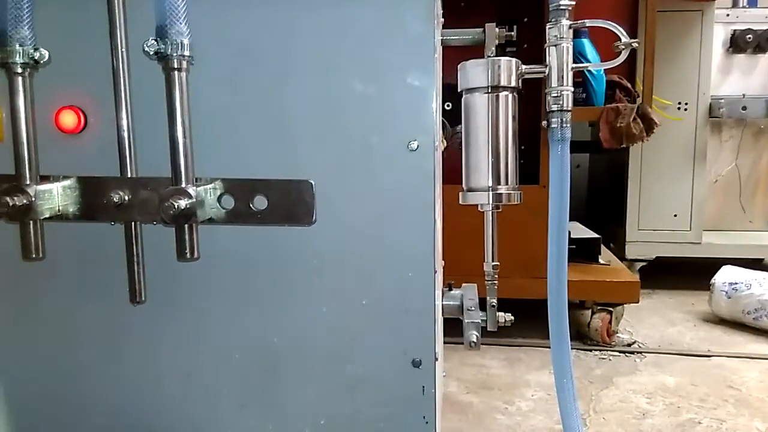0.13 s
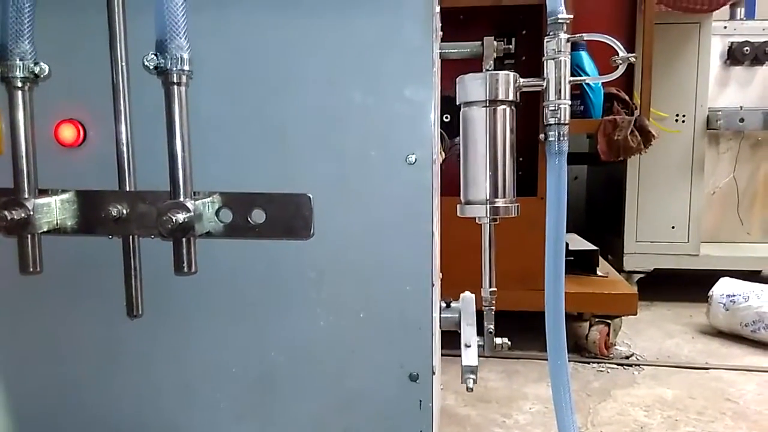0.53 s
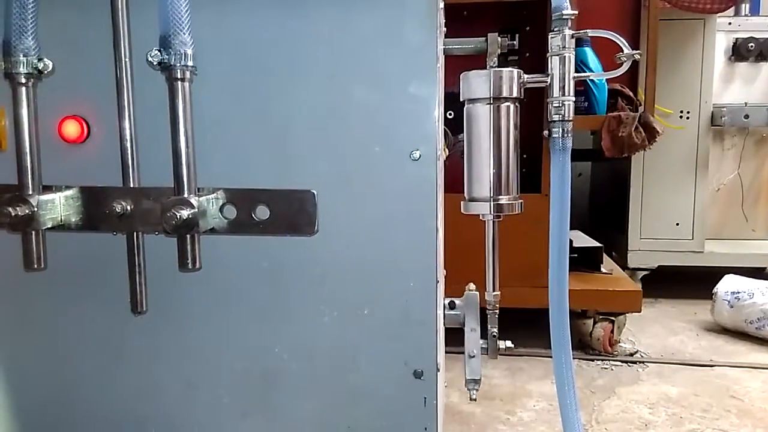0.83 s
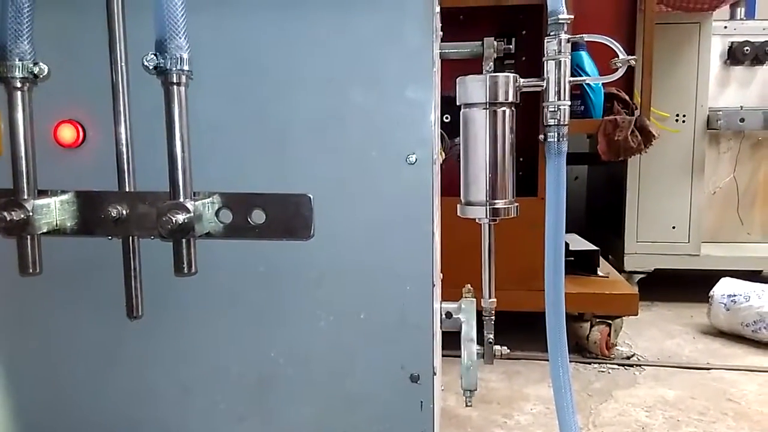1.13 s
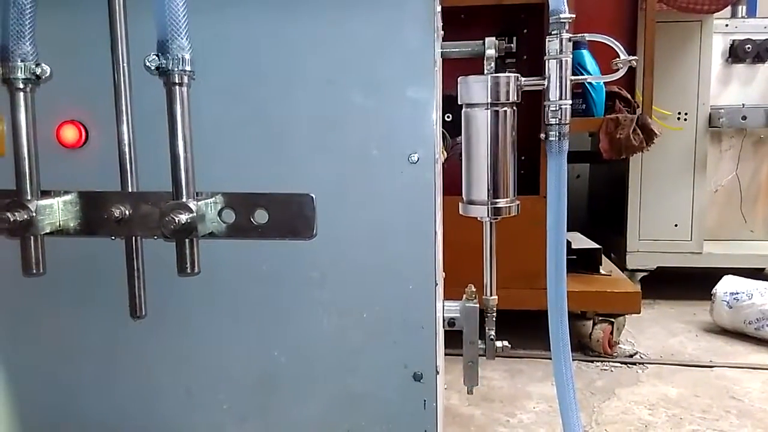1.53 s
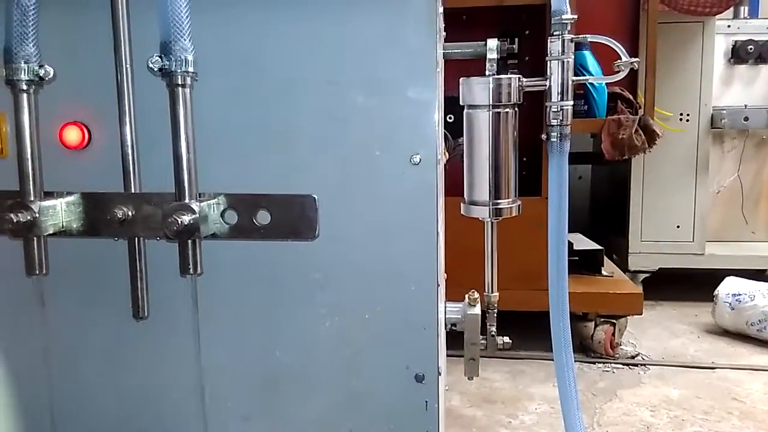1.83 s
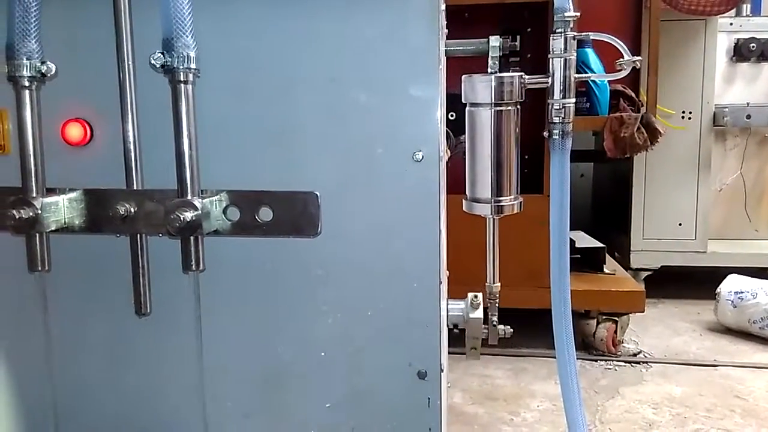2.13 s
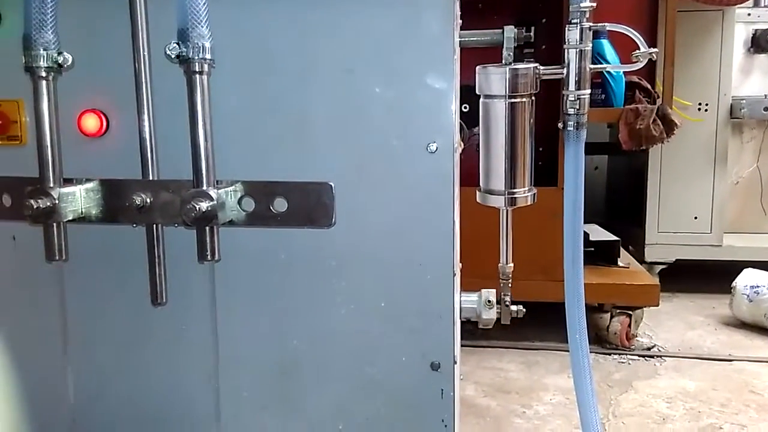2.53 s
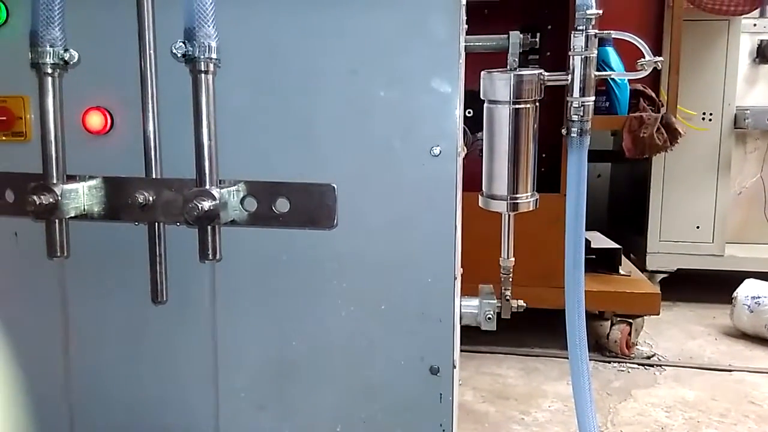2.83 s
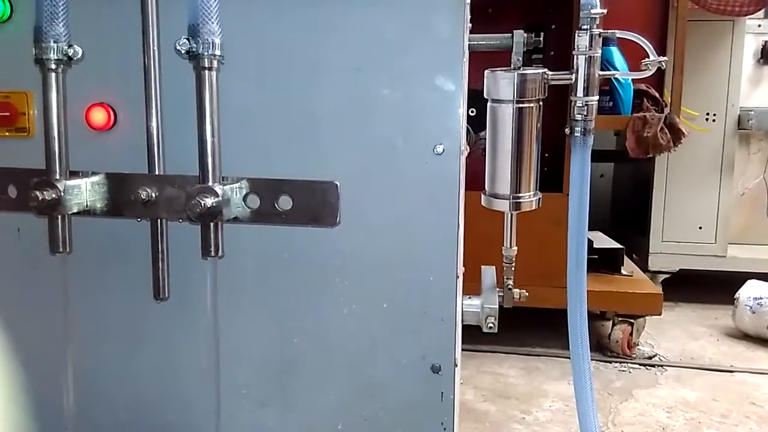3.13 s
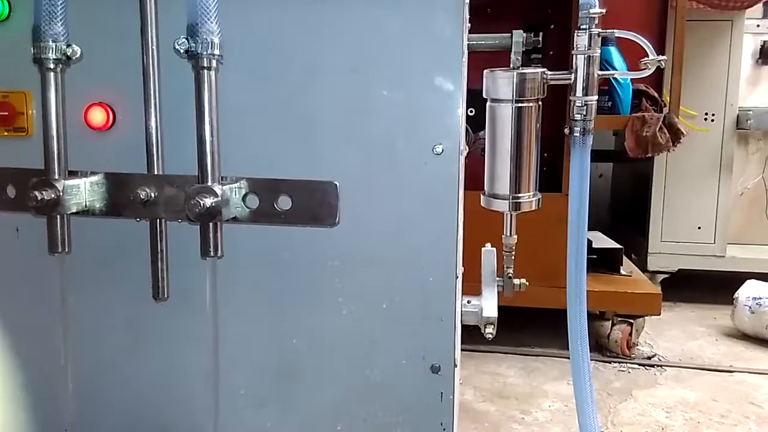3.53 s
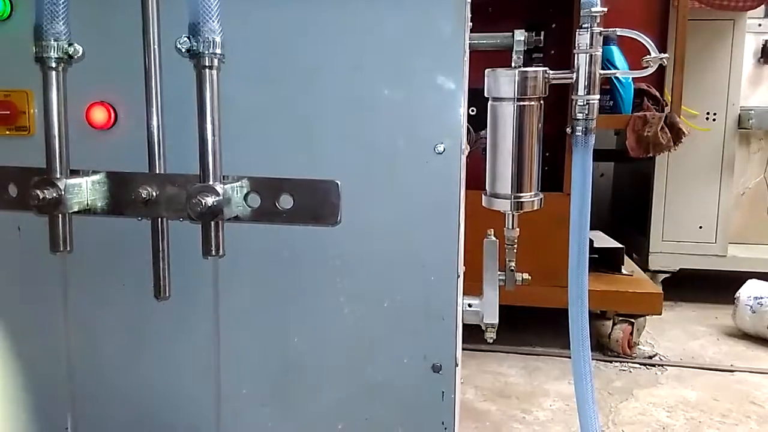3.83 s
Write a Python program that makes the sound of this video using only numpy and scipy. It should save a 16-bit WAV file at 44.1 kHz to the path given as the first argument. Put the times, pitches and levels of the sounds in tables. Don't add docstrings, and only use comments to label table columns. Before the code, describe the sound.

Liquid splattering from filling machine nozzles, after a quiet motor hum and a rising valve hiss

```python
import sys
import numpy as np
from scipy import signal
from scipy.fft import rfft, irfft, next_fast_len
from scipy.io import wavfile
from scipy.ndimage import uniform_filter1d, map_coordinates

SR = 44100
rng = np.random.default_rng(int(sys.argv[2]) if len(sys.argv) > 2 else 0)


def log_audio(samples):
    frames = np.atleast_2d(samples).T
    limited = np.clip(frames, -1, 1)
    pcm = np.round(limited * 32767).astype(np.int16)
    wavfile.write(sys.argv[1], SR, pcm)


def voltage_ratio(level):
    return 10 ** (np.asarray(level, float) / 20)


N = 176400

# (frequency [Hz], level [dB], unsteadiness [1])
HUM_LINES = [(71.3, -42, 1.6), (100.8, -32, 0.6), (140.4, -42, 0.49), (202.5, -47.5, 0.8), (225, -50, 0.59),
             (297.4, -41, 0.7), (323.6, -45.5, 0.2), (414, -62.5, 0.43), (554, -50, 1.37), (772, -51, 0.83),
             (862, -53, 1.8)]
# (time [s], level [dB])
MOTOR_LOAD = [(0, -4), (.45, -2.5), (.75, -3), (1.0, -2.5), (1.4, 1), (1.7, 6), (1.9, 4.5), (2.1, -1),
              (3.0, 1), (4, 5)]
# (frequency [Hz], share [dB per dB])
LOAD_SHARE = [(70, 0.5), (100, 0.5), (140, -0.1), (200, 0.5), (300, -0.9), (900, 0.5)]
# (frequency [Hz], density [dB per Hz])
MOTOR_SPECTRUM = [(40, -10.5), (170, -6), (550, -4), (1000, -8), (2200, -14.5), (4500, -26.5),
                  (8500, -24.5), (14000, -39)]
# (time [s], level [dB])
GEAR_JOLTS = [(.01, -40), (.26, -37), (.38, -31), (0.549, -22.5), (1.1, -40), (1.28, -38), (1.43, -40),
              (1.72, -39), (1.95, -38), (2.969, -28), (3.049, -19)]
# (time [s], level [dB])
SEAL_WHIR = [(0, -57), (.7, -60), (1.1, -56), (1.4, -50), (1.8, -53), (1.9, -44.5), (2.1, -51), (4, -67)]
# (time [s], level [dB])
VALVE_SQUEEZE = [
    (1.35, -54),
    (1.63, -46.5),
    (1.7, -46),
    (1.95, -41.5),
    (2.1, -61),
    (2.3, -83),
]
# (time [s], level [dB])
CRANK_TICKS = [
    (.682, -29),
    (.731, -39.5),
]
# (frequency [Hz], level [dB], decay T60 [s])
TICK_MODES = [(1320, 3.5, 0.016), (1560, 0.5, .02), (980, -16, .04), (2040, -19, .02)]
# (time [s], level [dB])
CRANK_KNOCKS = [
    (3.361, -18),
    (3.384, -20),
    (3.412, -21.5),
    (3.495, -28.5),
]
# (frequency [Hz], level [dB], decay T60 [s])
FRAME_MODES = [(105, -10, 0.38), (196, -7.5, 0.084), (241, -2.5, 0.14), (285, -7, 0.12),
               (522, -10.5, 0.085), (600, -9, 0.071), (866, -12, 0.13), (1620, -7, 0.056)]
# (time [s], level [dB])
JET_FLOW = [(1.95, -82), (1.97, -42.5), (2.02, -45), (2.034, -37), (2.042, -26.5), (2.125, -37.5),
            (2.17, -29), (2.25, -29), (2.35, -26), (2.365, -44), (2.39, -24.5), (2.6, -22.5), (3.0, -22.5),
            (3.3, -23.5), (3.47, -25), (3.55, -24), (3.95, -30), (4, -30)]
# (frequency [Hz], density [dB per Hz])
SPRAY_SPECTRUM = [(300, -9.5), (1000, -8), (1500, -10), (2300, -6.5), (4000, -3), (7600, -0.5),
                  (10500, -3.5), (14500, -9.5)]
# (frequency [Hz], width [Hz], level [dB])
TRAY_MODES = [(966, 96, 0), (1500, 87, 3), (1900, 280, -18), (2600, 1000, -4.5), (3100, 460, 0),
              (3690, 1400, 1), (4560, 490, -7)]
# (time [s], peak level [dB], swell [ms], tray body level [dB])
SLUG_LANDINGS = [(1.979, -27, 2.5, -18), (2.0237, -16, 2, -2), (2.037, 1, 1.3, -7), (2.0473, -3, 1.3, -0.5),
                 (2.053, -8.5, 2.3, 5), (2.0646, 3, 3.1, -1.5), (2.1343, 5, 1.6, -23),
                 (2.141, -2.5, 0.87, -10), (2.1439, 5, 1.1, -9), (2.147, -8, 1.4, -4),
                 (2.1555, 4.5, 3.3, -9), (2.1832, -2, 3.3, -3.5), (2.198, -7.5, 2.6, -10),
                 (2.224, 1.5, 3.6, 5.5), (2.2334, -1, 1.1, 5.5), (2.256, -3.5, 1.7, -17),
                 (2.37, 2.5, 3.9, -3), (2.413, 5.5, 1.3, -16), (2.432, -3, 1.5, -21), (2.4647, 5, 2.6, -11),
                 (2.4725, 2, 1.6, -15), (2.491, 1, 2.3, -20), (2.5792, -7, 3.1, 11),
                 (2.6032, -2.5, 3.8, 5.5), (2.6314, 1, 2.9, -1), (2.71, 4, 1.3, -23), (2.768, -5, 1.1, -12),
                 (2.811, -7, 7.8, -23), (2.826, -5, 4, -28), (2.837, 2, 1.4, -20), (2.8673, 0, 2.4, -6),
                 (2.914, 1.5, 1.6, -12), (2.933, 2, 2.6, -24), (2.976, -1.5, 2.6, -20),
                 (2.997, -3, 1.7, -5), (3.044, -3, 2, 2.5), (3.114, -1, 2.5, -17), (3.228, 0, 2.3, -5),
                 (3.271, -6.5, 4.4, -9), (3.283, 4.5, 3.6, -17), (3.298, 1.5, 1.9, -17),
                 (3.3989, 4.5, 3.1, -9), (3.436, -1, 3.8, -5), (3.493, -1.5, 2.9, -5),
                 (3.619, 1.5, 3.9, -9), (3.633, 1, 1.9, -21), (3.7934, -9, 1.2, -20), (3.847, 2, 0.54, -21),
                 (3.896, -11, 3.3, 2.5), (3.933, -9, 2.1, -13)]
# (time [s], frequency [Hz], level [dB], decay T60 [s])
BUBBLE_PLOPS = [(2.026, 1690, -14.5, 0.017), (2.056, 1874, -18, 0.024), (2.11, 1690, -13.5, 0.027),
                (2.178, 2260, -11.5, 0.022), (2.228, 1500, -23.5, 0.07), (2.051, 6500, -20, 0.027),
                (2.5, 3100, -22, 0.057), (2.232, 3750, -9.5, 0.044), (2.7, 3300, -14, 0.042),
                (3.2, 3000, -16, 0.025), (3.39, 2910, -14.5, 0.048), (3.215, 1160, -20, 0.025),
                (2.082, 1790, -21, 0.038), (2.122, 1850, -18, 0.032), (2.4, 1740, -25, 0.036),
                (3.37, 1620, -25, 0.03)]
# (frequency [Hz], width [Hz], depth [0-1])
PANEL_NOTCHES = [(2150, 220, .5), (2650, 380, .68), (3400, 420, .8), (5050, 250, .25)]
# (frequency [Hz], correlation [-1 to 1])
CHANNEL_LIKENESS = [(40, -0.87), (70, -0.94), (110, -0.96), (380, -0.89), (950, -0.49), (1600, -0.096),
                    (3000, 0.061), (15000, 0.1)]
# (frequency [Hz], level [dB])
LEFT_COLOUR = [(100, 1.5), (300, 2.5), (700, 3), (1400, 0), (3000, -0.5), (6000, 0.5), (8000, -6.5),
               (14000, 12)]
# (time [s], level [dB])
AUTO_GAIN = [
    (0, 6.5),
    (1.0, 8),
    (2.02, 6),
    (2.07, 2),
    (2.5, -2),
    (4, 2),
]
# (frequency [Hz], level [dB])
THINNING = [(60, -30), (500, -16), (1500, -7), (2700, -.5), (5500, -1), (7500, -11), (10000, -13),
            (14000, -6)]
# (time [s], upper edge [Hz])
BASS_DROPOUTS = [(2.1, 250), (2.21, 150), (2.34, 550), (2.4, 250), (2.44, 250), (2.6, 300), (2.64, 200),
                 (2.78, 150), (2.82, 150), (3.16, 150), (3.27, 250)]


def unit(x):
    return x / np.sqrt(np.mean(x ** 2) + 1e-20)


def along(points, hz):
    f, v = np.transpose(points)
    return np.interp(np.log(hz + 1), np.log(f + 1), v)


def curve(rows):
    return np.interp(np.arange(N) / SR, *np.transpose(rows))


def wobble(rate):
    knots = rng.standard_normal(int(N * rate / SR) + 4)
    return map_coordinates(knots, [np.arange(N) * rate / SR])


def filtered(x, response):
    m = next_fast_len(N + SR // 2)
    return irfft(rfft(x, m) * response(np.fft.rfftfreq(m, 1 / SR)), m)[..., :N]


def peak(f, hz, width_hz):
    return 1j * f * width_hz / (hz * hz - f * f + 1j * f * width_hz)


def patchy(depth_db):
    z = signal.stft(rng.standard_normal((2, N)), nperseg=256)[2]
    field = rng.standard_normal(z.shape[1:])
    field = uniform_filter1d(field, size=5, axis=0)
    field = uniform_filter1d(field, size=9, axis=1)
    return unit(signal.istft(z * voltage_ratio(depth_db * unit(field)), nperseg=256)[1][:, :N])


def rings(rows, rise):
    s, hz, db, t60 = np.transpose(rows)[..., None]
    t = np.arange(int(min(t60.max(), .5) * SR)) / SR
    at = (np.round(s * SR) + np.arange(len(t))).astype(int).ravel()
    shape = voltage_ratio(db - 60 * t / t60) * (1 - np.exp(-4 * hz * t))
    start = rng.random((len(s), 2)).T[..., None]
    phases = 2 * np.pi * (hz * t * (1 + rise * t / t60) + start)
    return np.array([np.bincount(at, (shape * np.sin(p)).ravel(), N)[:N] for p in phases])


def machine():
    gain_ref_db = 8
    t = np.arange(N) / SR
    load = curve(MOTOR_LOAD)
    hum = np.zeros(N)
    for hz, db, loose in HUM_LINES:
        level = db + along(LOAD_SHARE, hz) * load + 3.54 * loose * wobble(13)
        hum += voltage_ratio(level) * np.sin(2 * np.pi * hz * t + 1.3 * loose * wobble(14))
    hum = np.array([hum, np.roll(hum, SR // 30)])

    noise = unit(filtered(patchy(depth_db=1.5), lambda f: voltage_ratio(along(MOTOR_SPECTRUM, f))))
    noise = voltage_ratio(-37.5 + 0.84 * wobble(0.63)) * noise

    lumps = rng.standard_normal((2, N)) * voltage_ratio(4 * wobble(5.7))
    rumble = voltage_ratio(-46) * unit(filtered(lumps, lambda f: peak(f, 68, 40) ** 2))

    jolts = rings([(s, 70, db, .25) for s, db in GEAR_JOLTS], rise=0)
    jolts = filtered(jolts, lambda f: peak(f, 70, 60))

    whir = unit(filtered(patchy(depth_db=1.0), lambda f: peak(f, 2400, 1500) ** 2))
    whir = whir * voltage_ratio(curve(SEAL_WHIR))

    def valve_and_nozzle(f):
        valve = voltage_ratio(12) * peak(f, 5300, 500)
        nozzle = voltage_ratio(6.5) * peak(f, 8040, 1200)
        return voltage_ratio(along(SPRAY_SPECTRUM, f)) + valve + nozzle

    hiss = unit(filtered(rng.standard_normal((2, N)), valve_and_nozzle))
    hiss = voltage_ratio(curve(VALVE_SQUEEZE)) * (t > VALVE_SQUEEZE[0][0]) * hiss
    return voltage_ratio(-gain_ref_db) * (hum + noise + rumble + jolts + whir + hiss)


def crank():
    rattle_db, rattle_t60_s = -8, 0.29
    blows = []
    for hits, modes in ((CRANK_TICKS, TICK_MODES), (CRANK_KNOCKS, FRAME_MODES)):
        blows += [(s, hz, db + g, t60) for s, db in hits for hz, g, t60 in modes]
    t = np.arange(N) / SR
    shake = np.zeros(N)
    for s, db in CRANK_KNOCKS:
        shake += voltage_ratio(db + rattle_db - 60 * np.abs(t - s) / rattle_t60_s) * (t > s)
    colour = [mode[:2] for mode in FRAME_MODES]
    noise = rng.standard_normal((2, N))
    rattle = unit(filtered(noise, lambda f: voltage_ratio(along(colour, f)) * peak(f, 540, 1800)))
    return rings(blows, rise=0) + shake * rattle


def tray(f):
    return np.sqrt(sum(np.abs(voltage_ratio(g) * peak(f, hz, width)) ** 2 for hz, width, g in TRAY_MODES))


def stream():
    drops_per_s, drop_spread_db, drop_db = 3000, 3.6, -4
    bubbles_per_s, bubble_hz, bubble_cycles, bubble_db = 260, 2700, 11, -16.5
    tray_db = -8.5

    size_db = np.minimum(rng.exponential(1, N), 3) * drop_spread_db
    hits = (rng.random(N) < drops_per_s / SR) * voltage_ratio(size_db)
    hits = uniform_filter1d(hits, size=9) * rng.standard_normal((2, N))
    spray = patchy(depth_db=2.53) + voltage_ratio(drop_db) * unit(hits)
    spray = unit(filtered(spray, lambda f: voltage_ratio(along(SPRAY_SPECTRUM, f)) * (1 + voltage_ratio(tray_db) * tray(f))))

    draw = rng.random((800, 3))
    s = 1.9 - np.cumsum(np.log(draw[:, 0])) / bubbles_per_s
    hz = bubble_hz * np.exp(1.37 * (draw[:, 1] - .5))
    rows = np.transpose([s, hz, 9 * draw[:, 2] ** 2, 3 * bubble_cycles / hz])
    bubbles = unit(rings(rows[s < N / SR], rise=0.16)) * voltage_ratio(bubble_db)

    flow_db = curve(JET_FLOW) + 0.05 * wobble(8) + 0.3 * wobble(35) + 1.1 * wobble(120)
    started = np.arange(N) > JET_FLOW[0][0] * SR
    return voltage_ratio(flow_db) * (spray + bubbles) * started


def slugs():
    slug_db, tail = -17.5, 0.78
    s, db, swell_ms, body_db = np.transpose(SLUG_LANDINGS)[..., None]
    k = np.arange(SR // 10)
    at = (np.round(s * SR) + k).astype(int).ravel()
    u = k / SR * 1000 / swell_ms
    swell = np.sin(np.pi / 2 * np.clip(u, 0, 1))
    shape = voltage_ratio(db + slug_db) * swell * np.exp(-tail * np.clip(u - 1, 0, None))

    def lay(rows):
        return np.bincount(at, rows.ravel(), N)[:N]

    burst = lay(shape) * voltage_ratio(0.72 * wobble(400)) * rng.standard_normal((2, N))
    burst = filtered(burst, lambda f: 1.46 * voltage_ratio(along(SPRAY_SPECTRUM, f)))
    body = lay(shape * voltage_ratio(body_db)) * rng.standard_normal((2, N))
    body = 4 * filtered(body, lambda f: tray(f) * peak(f, 3430, 3100))
    return burst + body + rings(BUBBLE_PLOPS, rise=0.26)


def room(x):
    t60_s, tail_db = 0.54, -7
    t = np.arange(SR // 2) / SR
    tail = rng.standard_normal((2, len(t))) * voltage_ratio(-60 * t / t60_s) * (t > .004)
    return x + voltage_ratio(tail_db) * signal.fftconvolve(x, tail / np.linalg.norm(tail[0]), axes=1)[:, :N]


def panel(f):
    return np.prod([1 - depth * peak(f, hz, width) for hz, width, depth in PANEL_NOTCHES], axis=0)


def drifting(x):
    drift, drift_per_s = .022, 11
    mix = .5 + .5 * np.tanh(wobble(drift_per_s))
    lower = filtered(x, lambda f: panel(f * (1 + drift)))
    higher = filtered(x, lambda f: panel(f * (1 - drift)))
    return mix * lower + (1 - mix) * higher


def scene():
    fields = machine() + drifting(room(stream() + slugs() + crank()))

    def angle(f):
        return np.arccos(np.clip(along(CHANNEL_LIKENESS, f), -.995, .995)) / 2

    side = filtered(fields[0], lambda f: np.sin(angle(f)))
    mid = filtered(fields[1], lambda f: np.cos(angle(f)))
    return np.array([mid + side, mid - side])


def thin_out(x):
    scatter_db, other_side_db = 6.5, -6
    bass_hz, bass_mask_db, bass_scatter_db, dropout_s = 550, -25, 8, .032
    hz, s, z = signal.stft(x, SR, nperseg=2048)
    level = np.sqrt(np.abs(uniform_filter1d(np.abs(z) ** 2, size=40, axis=1)))
    level = np.maximum(level, voltage_ratio(other_side_db) * level[::-1])
    jump = rng.standard_normal((2, 129, z.shape[2]))
    jump = np.repeat(jump, 8, axis=1)[:, :len(hz)]
    threshold = level * voltage_ratio(along(THINNING, hz)[:, None] + scatter_db * jump[0])
    z = z * (np.abs(z) > threshold)

    mid = z.mean(0)
    loud = np.sqrt(np.mean(np.abs(z) ** 2, axis=(0, 1)))
    bass_jump = (jump[1] + jump[1, 0]) / 2
    faint = np.abs(mid) < loud * voltage_ratio(bass_mask_db + bass_scatter_db * bass_jump)
    faint = faint & (hz < bass_hz)[:, None]
    for at, top in BASS_DROPOUTS:
        faint = faint | ((hz < top)[:, None] & (np.abs(s - at) < dropout_s))
    return signal.istft(z - mid * faint, SR, nperseg=2048)[1][:, :N]


def top_cut(x):
    return signal.sosfilt(signal.butter(12, 15570, fs=SR, output="sos"), x)


def record(dry):
    top_hz, over_top_db = 14260, -37
    port_hz, port_width_hz, port_db = 10118, 1007, 21
    left = filtered(dry[0], lambda f: voltage_ratio(along(LEFT_COLOUR, f)) + voltage_ratio(port_db) * peak(f, port_hz, port_width_hz))
    x = filtered(np.array([left, dry[1]]), lambda f: f < top_hz)
    x = thin_out(x * voltage_ratio(curve(AUTO_GAIN)))
    x = np.clip(x, -1, 1)
    mix = filtered(x, lambda f: np.where(f < top_hz, 1, voltage_ratio(over_top_db)))
    return top_cut(mix)


dry = scene()
out = record(dry)
log_audio(out)
```